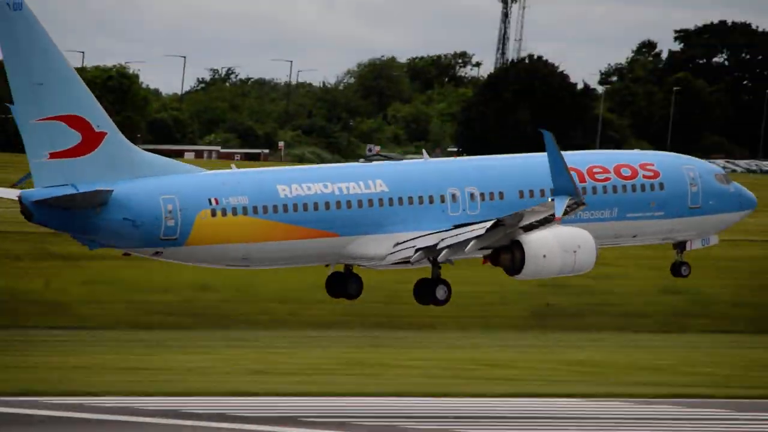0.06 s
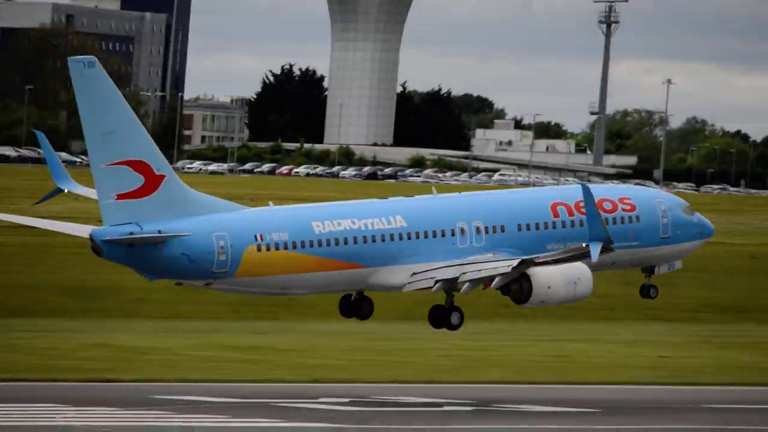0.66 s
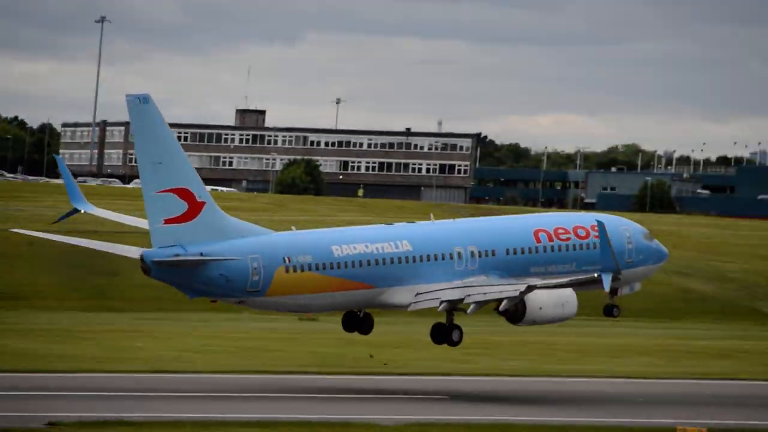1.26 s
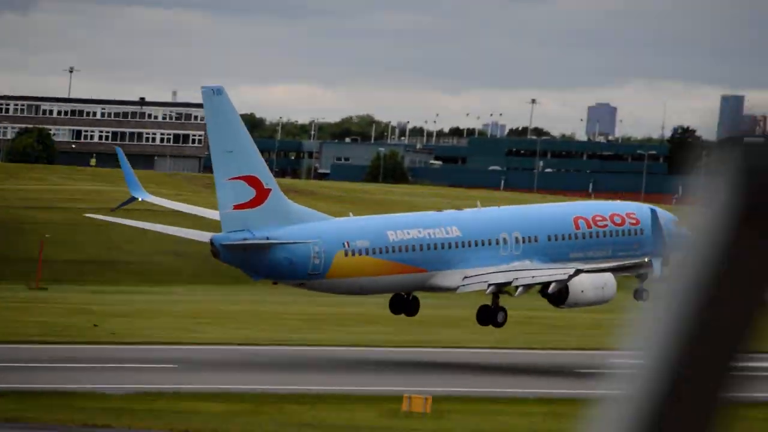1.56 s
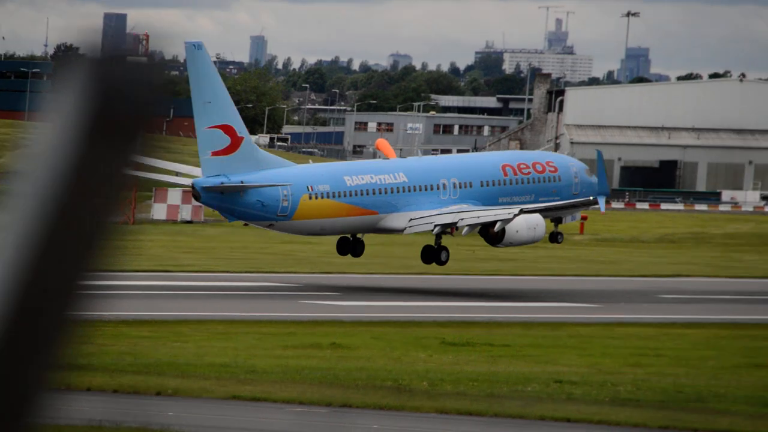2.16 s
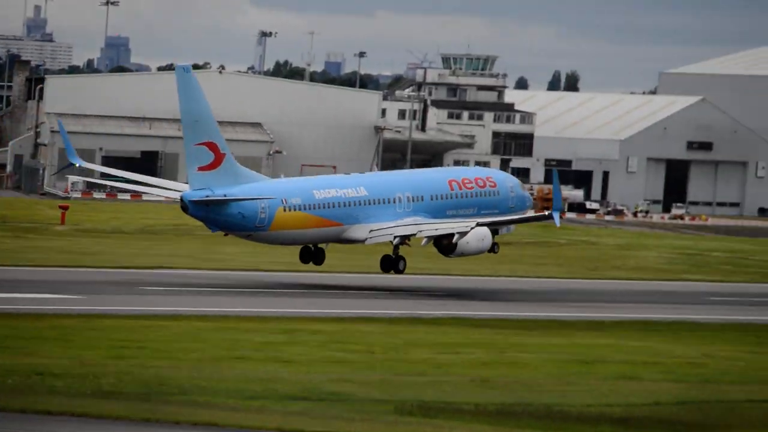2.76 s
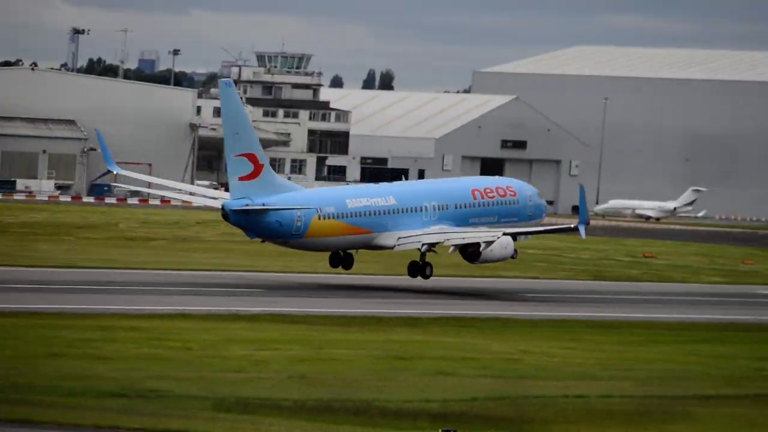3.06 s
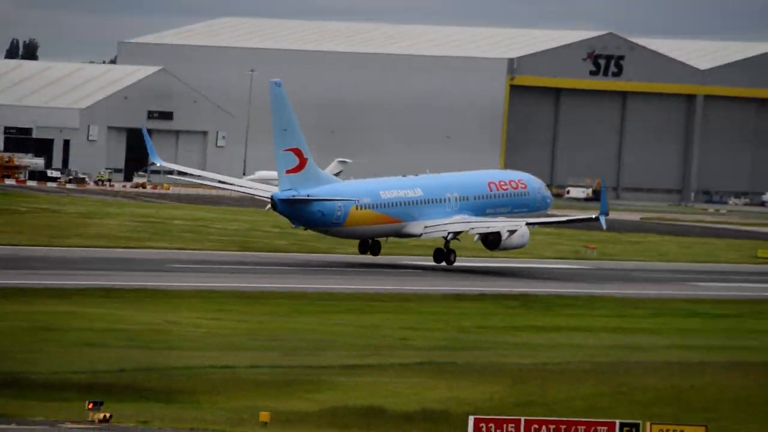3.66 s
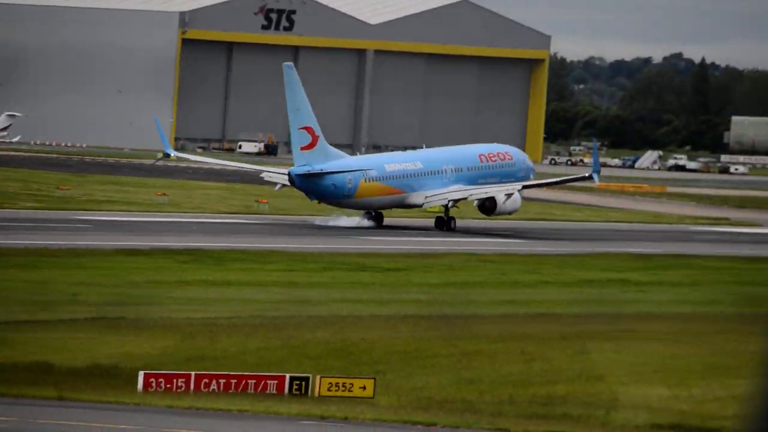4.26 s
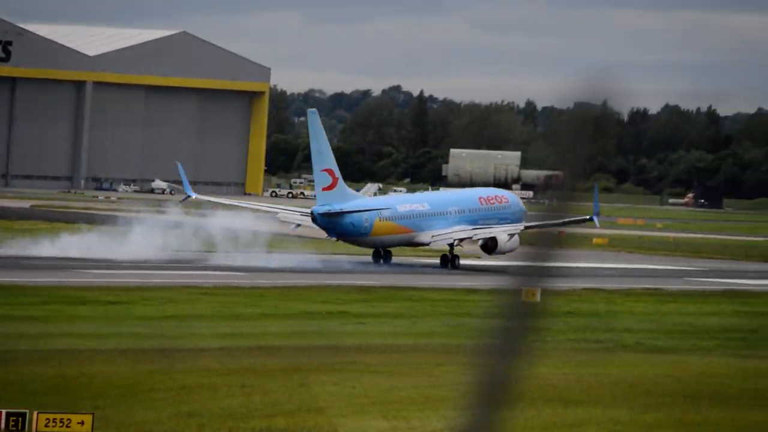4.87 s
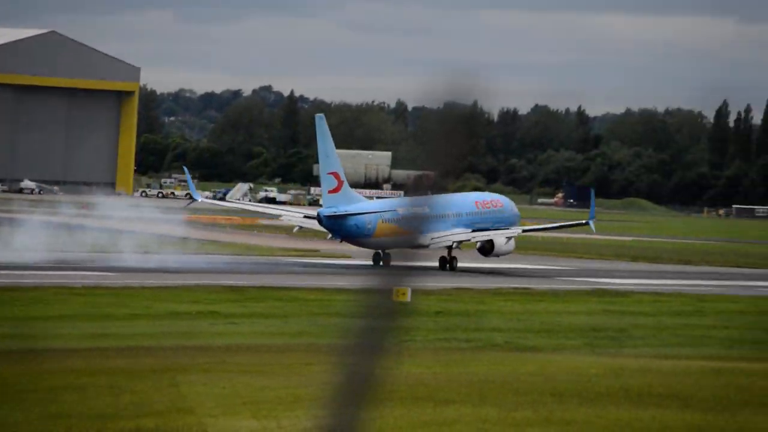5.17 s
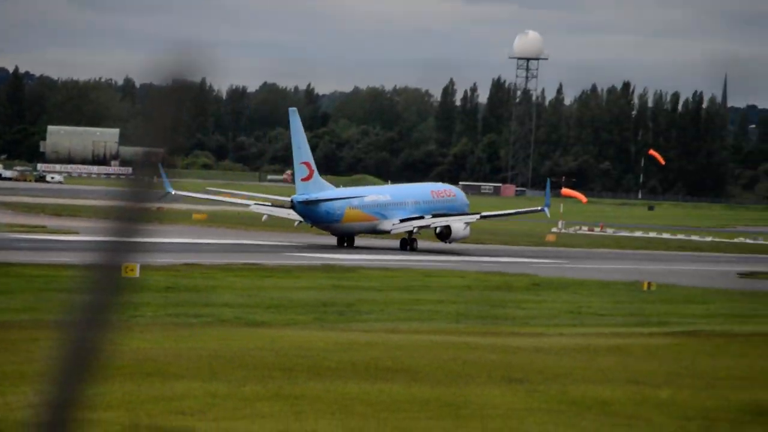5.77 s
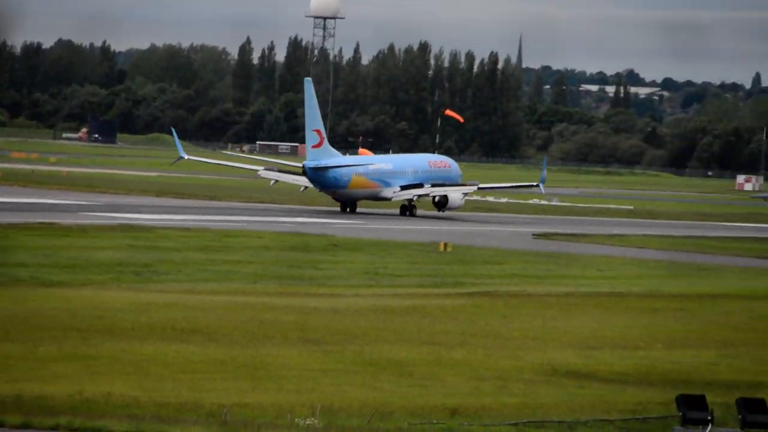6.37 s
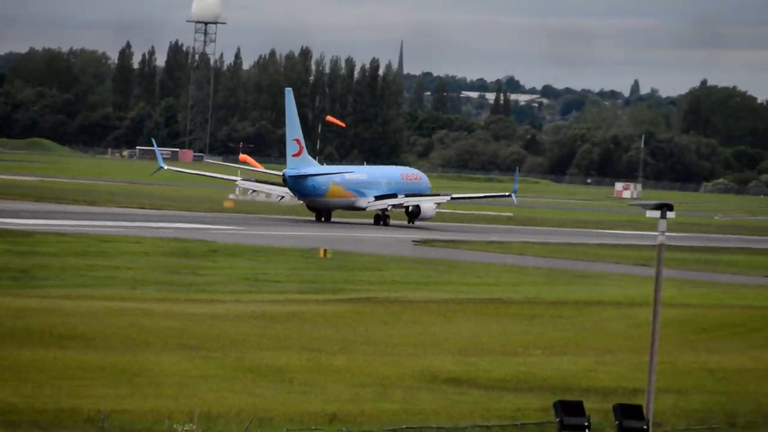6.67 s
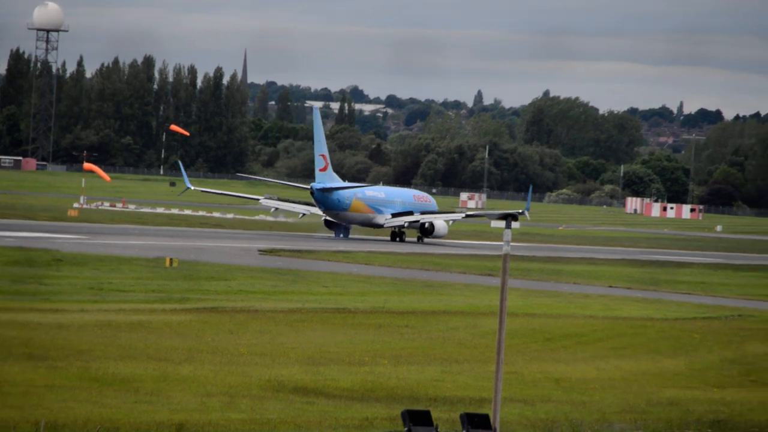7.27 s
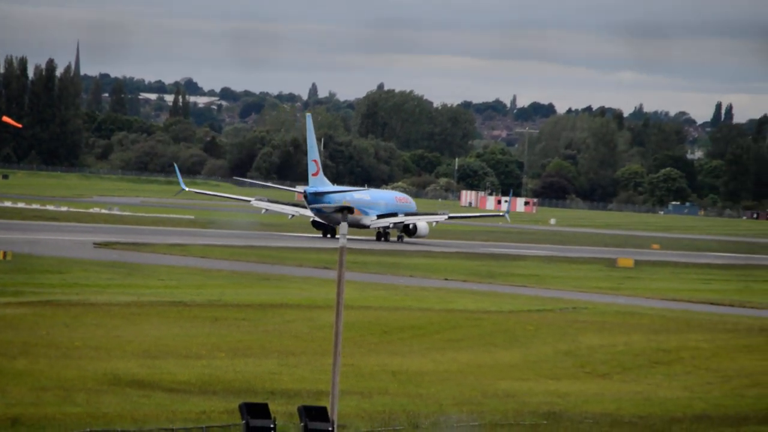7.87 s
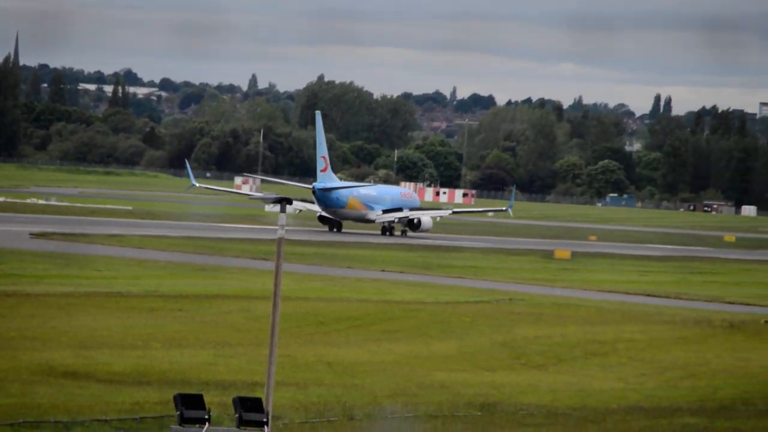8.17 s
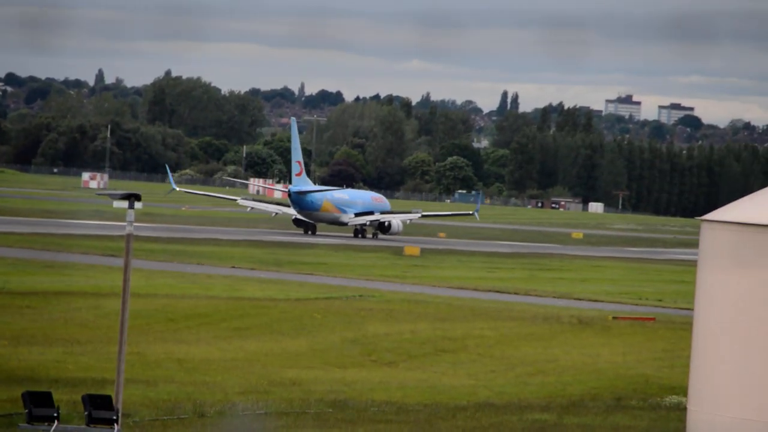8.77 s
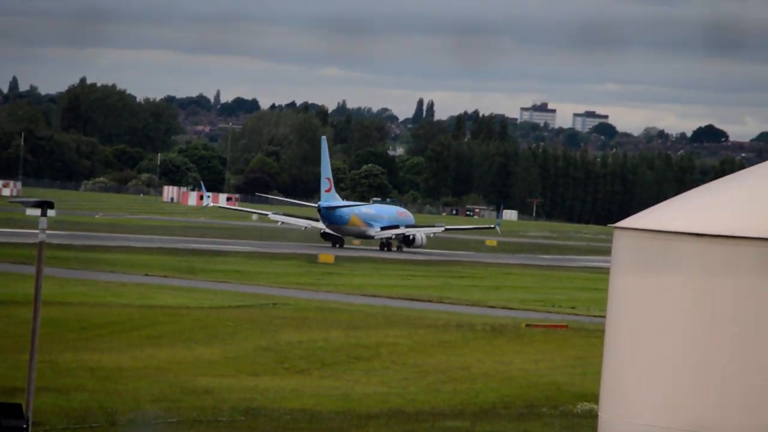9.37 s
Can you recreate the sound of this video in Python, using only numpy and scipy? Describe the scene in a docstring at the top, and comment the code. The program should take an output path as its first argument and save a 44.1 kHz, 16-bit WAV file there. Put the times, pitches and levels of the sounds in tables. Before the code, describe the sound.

Deep, ragged wind rumble and thumps hit the microphone over a receding jet, its hiss giving way to a faint, distant whine.

```python
"""A jet airliner recedes along the runway, heard from the windy airfield fence.
Air absorption dulls its hiss with distance, the roar fades, the turbine whistle sinks by Doppler shift,
and later the fans whine from far off; moving air makes them all swell and flicker.
Eddies on the microphone port give a deep, ragged rumble, sharp pops and thumps, and overload it.
Faint beneath: microphone hiss, two high ticks and a distant bird."""
import sys
import numpy as np
from scipy import signal
from scipy.fft import rfft, irfft, next_fast_len
from scipy.io import wavfile
from scipy.ndimage import uniform_filter1d, map_coordinates

SR = 44100
rng = np.random.default_rng(int(sys.argv[2]) if len(sys.argv) > 2 else 0)


def wav_record(signal):
    """Record a signal, one row per channel, as 16-bit PCM in the file named by sys.argv[1]."""
    frames = np.transpose(np.atleast_2d(signal))
    bounded = np.clip(frames, -1, 1)
    # unit amplitude maps onto the largest positive 16-bit level
    quanta = np.round(bounded * 32767).astype(np.int16)
    wavfile.write(sys.argv[1], SR, quanta)


N = 414981

# Strong eddies bursting on the port. Each row: time in seconds, peak in dB, edge steepness in Hz.
POPS = [(.165, -1, 800), (.435, -6, 600), (.475, -4, 520), (.565, -1, 660), (.577, -4, 700), (.61, -4, 650),
        (.894, -5, 740), (.955, -2.5, 840), (.974, -4, 750), (1.007, -2, 840), (1.016, -6.5, 840),
        (1.102, -4, 720), (1.197, -4, 700), (1.252, -7, 700), (1.314, -3.5, 920), (1.428, -6, 760),
        (1.539, -7, 800), (1.555, -2.5, 800), (1.578, -8, 750), (1.64, -5, 760), (1.706, -7.5, 750),
        (1.94, -6, 700), (2.073, -1, 720), (2.344, -3, 650), (2.406, -1.5, 700), (2.425, -3, 920),
        (2.523, -5.5, 680), (2.533, -8, 650), (2.674, -2, 600), (2.705, 1, 1280), (2.832, -3, 500),
        (2.885, -8, 680), (3.024, -8, 600), (3.167, -7, 720), (3.207, -2.5, 557), (3.648, -7, 650),
        (3.753, -1.5, 710), (3.829, -6, 780), (3.986, -1, 660), (4.016, -6, 720), (4.037, -5, 660),
        (4.131, -6, 600), (4.367, -1, 680), (4.372, -5, 680), (4.419, -3, 580), (4.453, -5, 700),
        (4.518, -3.5, 560), (4.536, -2.5, 620), (4.568, -2, 740), (4.599, -2, 660), (4.655, -5, 680),
        (5.006, -2.5, 800), (5.147, -2, 650), (5.175, -8, 720), (5.4, -3.5, 720), (5.657, -3, 980),
        (5.675, -3.5, 650), (5.816, -4, 760), (5.912, -7, 700), (6.104, -2, 880), (6.201, -7, 620),
        (6.254, -3.5, 700), (6.303, -6, 660), (6.353, -5.5, 740), (6.8, -6.5, 740), (7.074, -2, 680),
        (7.131, -8, 800), (7.263, -7, 600), (7.367, -3, 720), (7.525, -6.5, 650), (7.626, -2, 563),
        (7.67, -1, 680), (7.738, -1.5, 680), (7.755, -3.5, 620), (7.82, -5, 520), (7.976, -2, 620),
        (8.118, -4.5, 620), (8.282, -9.5, 1320), (8.508, -1, 720), (8.589, -5.5, 650), (8.632, -5, 780),
        (8.647, -2, 780), (8.812, -1, 650), (8.954, -3, 560), (8.984, -11, 1800), (9.023, -12, 1280),
        (9.125, -15, 1700), (9.13, -4, 750), (9.158, -4.5, 800), (9.251, 1.5, 1330), (9.27, -9, 720),
        (9.382, -4, 480)]
RUMBLE_DB, FLUTTER_DB = -17.5, -24  # steady breeze


def amp(db):
    """Decibels to gain."""
    return 10 ** (np.asarray(db) / 20)


def unit(x):
    """Scale to rms 1."""
    return x / np.sqrt(np.mean(x ** 2) + 1e-20)


def curves(rows):
    """Per-sample curve for each column after the time."""
    times_s, *columns = np.transpose(rows)
    return [np.interp(np.arange(N) / SR, times_s, column) for column in columns]


def plateaus(rows, rise_s, fall_s):
    """Each (start, length, height, ..) row rises, holds and falls; one summed curve per height column."""
    t = np.arange(N) / SR
    out = np.zeros((len(rows[0]) - 2, N))
    for start_s, length_s, *heights in rows:
        ramp = np.minimum((t - start_s) / rise_s, (start_s + length_s - t) / fall_s)
        out += np.outer(heights, np.clip(ramp + .5, 0, 1))
    return out


def wobble(knots_per_s):
    """Smooth random curve, rms 1."""
    position = np.arange(N) * knots_per_s / SR + 2
    return unit(map_coordinates(rng.standard_normal(N // 16), [position], order=3, mode="mirror"))


def noise(spectrum, size=N):
    """Noise of rms 1 coloured by (Hz, dB) points."""
    fft_size = next_fast_len(size)
    hz, db = np.transpose(spectrum)
    gain = amp(np.interp(np.log(np.fft.rfftfreq(fft_size, 1 / SR) + 1), np.log(hz), db))
    return unit(irfft(rfft(rng.standard_normal(fft_size)) * gain, fft_size)[:size])


def steadied(x, window_s):
    """Hold the rms near 1 over the window, keeping faster surges."""
    width = max(int(window_s * SR), 1)
    power = uniform_filter1d(uniform_filter1d(x ** 2, width), width)
    return x / np.sqrt(np.abs(power) + 1e-9)


def fuzzy_tone(hz, width_hz):
    """Tone scattered into a band, as by turbulent air; rms 1."""
    phase = 2 * np.pi * np.cumsum(hz) / SR
    return unit(wobble(width_hz) * np.cos(phase) + wobble(width_hz) * np.sin(phase))


def settling(tau_s):
    """Falls from 1 towards 0 as the jet turns its tail to the listener."""
    return np.exp(-np.arange(N) / SR / tau_s)


def distance_m(t):
    """Range of the jet, already past its nearest point."""
    nearest_m, speed_m_per_s, passed_s = 105, 66, 1
    return np.hypot(nearest_m, speed_m_per_s * (t + passed_s))


def air(x, steepness, tilt):
    """Air absorption: distance tilts the treble down and closes a steep low-pass."""
    hz, t, spectra = signal.stft(x, SR, nperseg=512)
    start_corner_hz = 7400
    corner_hz = start_corner_hz * (distance_m(0) / distance_m(t)) ** .35
    farness = start_corner_hz / corner_hz - 1
    treble_octaves = np.log2(np.maximum(hz, 1000) / 1000)[:, None]
    gain = amp(-tilt * farness * treble_octaves) / np.sqrt(1 + (hz[:, None] / corner_hz) ** steepness)
    return signal.istft(spectra * gain, SR, nperseg=512)[1][:N]


def patchy(x, depth_db):
    """Moving air focuses some pitches and cancels others, in passing patches."""
    spectra = signal.stft(x, SR, nperseg=512)[2]
    field = rng.standard_normal(spectra.shape)
    for _ in range(2):
        field = uniform_filter1d(uniform_filter1d(field, size=9, axis=0), size=16, axis=1)
    return signal.istft(spectra * amp(depth_db * unit(field)), SR, nperseg=512)[1][:N]


def jet(swell_db):
    """Engine hiss and roar: loud side-on, faint from behind, flickering in the moving air."""
    # Spectra. Each row: frequency in Hz, relative density in dB.
    hiss_spectrum = [(300, -20), (900, -7.5), (1500, 5), (2200, 5.5), (3000, 4), (4100, 2), (5100, 1),
                     (6500, -1.5), (9000, -6.5), (11000, -21), (16000, -19)]
    roar_spectrum = [(30, -14), (120, -18), (300, -8.5), (650, -2.5), (1100, -2), (1600, -11.5),
                     (2500, -19), (5000, -65), (9000, -120)]
    hiss = steadied(air(noise(hiss_spectrum), steepness=9.2, tilt=10), window_s=.26)
    hiss = unit(patchy(hiss, depth_db=1.6))
    flicker_db = .8 * wobble(30)
    hiss_db = -51 + 21.5 * settling(tau_s=1.31) + swell_db + flicker_db
    roar_db = -43.5 + 18.5 * settling(tau_s=1.02) + .43 * swell_db + flicker_db
    return amp(hiss_db) * hiss + amp(roar_db) * noise(roar_spectrum)


def turbine(swell_db):
    """Thin whistles share one Doppler glide and fade into the air."""
    # Turbine partials. Each row: ratio to the pitch, relative level in dB.
    partials = [(.4975, -4), (.586, -6), (.6425, -4), (.805, -5), (1, 1.5), (1.05, -7), (1.116, -3),
                (1.218, -6), (1.628, -11)]
    receding_hz, doppler_hz, fall_db_per_s = 5270, 540, 10
    hz = receding_hz + doppler_hz * settling(tau_s=1.8)
    level_db = -49 - fall_db_per_s * np.arange(N) / SR + .5 * swell_db
    whistles = sum(amp(db) * fuzzy_tone(ratio * hz, width_hz=32) for ratio, db in partials)
    return air(amp(level_db) * whistles, steepness=6.2, tilt=7)


def wind_levels():
    """Rumble level, flutter level and brightness of the breeze through gusts and lulls."""
    # Each row: start in seconds, length in seconds, flutter gain in dB, brightness in octaves.
    gusts = [(.14, .12, 5.5, 0.1), (.41, .21, 9.5, 0.016), (.87, .17, 5, 0.0021), (1.08, .67, 2.5, 0.28),
             (1.95, .17, 6.5, 0.22), (2.18, .04, 4.5, -0.0069), (2.32, .14, 7.5, -0.086),
             (2.67, .05, 9, 0.069), (3.6, .23, 4, -0.017), (3.98, .07, 4, 0.24), (4.39, .23, 5, 0.085),
             (5, .17, 6.5, -0.072), (5.64, .19, 9, 0.00073), (6.22, .14, 6.5, 0.021),
             (7.62, .22, 8, 0.0059), (7.97, .05, 8, 0.017), (8.22, .1, 6.5, 0.036), (8.46, .09, 10.5, .3),
             (8.59, .11, 5.5, 0.19), (8.8, .05, 4.5, 0.13), (8.89, .11, 11, -0.27), (9.08, .08, 10, -0.082)]
    # Each row: start in seconds, length in seconds, flutter drop in dB, rumble drop in dB.
    lulls = [(.19, 0.17, -0.5, 6), (.74, .11, 1, 2.5), (1.77, 0.097, 4.5, 3.5), (2.12, .06, 10.5, 8),
             (2.22, 0.055, 8, 7), (2.5, .16, 7.5, 7), (2.88, .12, 4.5, 0.5), (3.05, .07, 8.5, 6),
             (3.27, .08, 6.5, -1), (3.41, .13, 6.5, -1), (3.86, .11, 0, 3), (4.05, .05, 5, 5),
             (4.67, .05, 7.5, 7), (4.86, .07, 5, -2.5), (5.21, .12, 5, 2.5), (5.42, .15, 6, 5),
             (5.94, .14, 6, 1.5), (6.49, 0.066, 8, 4), (7.15, .05, 10, 3.5), (7.53, .07, 5.5, 3.5),
             (7.88, .08, 6.5, 4), (8.33, .1, 3, 1.5), (8.52, 0.367, 0.5, 8), (8.72, .07, 7, 6)]
    gust_db, bright_octaves = plateaus(gusts, rise_s=.022, fall_s=.03)
    flutter_drop_db, rumble_drop_db = plateaus(lulls, rise_s=.03, fall_s=.022)
    # The flutter stalls just before each strong pop, less so in a gust.
    stall_s, stall_depth_db = .03, 8
    stalls = [(at_s - stall_s, stall_s, stall_depth_db) for at_s, _, _ in POPS]
    stall_db, = plateaus(stalls, rise_s=stall_s / 2, fall_s=stall_s / 2)
    wander_db = 3.4 * np.tanh(wobble(55))
    rumble_db = RUMBLE_DB - rumble_drop_db + 2.3 * np.tanh(wobble(22))
    flutter_db = FLUTTER_DB + gust_db - flutter_drop_db - stall_db * amp(-gust_db)
    return rumble_db + wander_db, flutter_db + wander_db, bright_octaves


def wind(rumble_db, flutter_db, bright_octaves):
    """Eddies sweep the port: faster flow is louder and brighter; gusts merge them into a full buffet."""
    # Spectra. Each row: frequency in Hz, relative density in dB.
    rumble_spectrum = [(10, -17.5), (25, -20.5), (50, -5), (85, -0.5), (125, -0.5), (200, -6), (300, -10.5),
                       (500, -21.5), (1000, -62.5), (2000, -120)]
    flutter_spectrum = [(40, -32), (120, -14.5), (220, 5), (450, 1.5), (700, -7), (1000, -17.5),
                        (1500, -30.5), (2200, -54.5), (4000, -100), (6000, -120)]  # at speed 1
    surge = 1.7 * np.tanh(wobble(60) * .45 + wobble(280) * .55)
    fronts = np.tanh(np.maximum(wobble(380) - .7, 0))  # steep edges of single eddies
    gust = np.clip((flutter_db - FLUTTER_DB) / 8, 0, 1)
    speed = 2 ** bright_octaves * np.exp(.26 * surge + .46 * fronts - .05)
    turbulence = noise(flutter_spectrum, size=2 * N)
    eddies = map_coordinates(turbulence, [np.cumsum(speed)], order=3, mode="mirror")
    eddies *= amp((5.9 * surge + 3.2 * fronts) * (1 - .4 * gust))
    flutter = (1 - gust) * steadied(eddies, window_s=.035) + gust * steadied(eddies, window_s=.01)
    rumble = steadied(noise(rumble_spectrum) * amp(4 * surge), window_s=.05)
    return amp(rumble_db) * rumble + amp(flutter_db) * flutter


def mic_hiss():
    """Faint self-noise that swells softly now and then."""
    # Each row: frequency in Hz, relative density in dB.
    spectrum = [(100, -2), (5000, -0.5), (9000, -1), (12000, -4), (16000, -9)]
    # Each row: start in seconds, length in seconds, gain in dB.
    swells = [(2.92, .55, 3), (3.95, .25, 4), (5.98, 0.29, 6), (7.25, 0.41, 3), (8.78, .22, 7.5)]
    swell_db, = plateaus(swells, rise_s=.12, fall_s=.12)
    return amp(-70.5 + swell_db) * noise(spectrum)


def swing(edge_hz, size):
    """One pressure swing, peak 1; a steeper edge gives more treble."""
    ratio = np.fft.rfftfreq(size, 1 / SR) / edge_hz
    crack = amp(-27) * min(edge_hz / 1400, 1) ** 7  # only the steepest swings crack
    gain = ratio ** .22 * (np.exp(-.75 * ratio ** 1.5) + crack * np.exp(-ratio / 3))
    shape = np.roll(irfft(gain * np.exp(2j * np.pi * rng.random()), size), size // 2)
    return shape / np.abs(shape).max()


def random_pops(flutter_db, db, edge_hz, count):
    """Weak bursts as rows like POPS: more frequent in gusts, softer in lulls."""
    chance = np.cumsum(amp(flutter_db))
    at = np.searchsorted(chance, rng.uniform(.01, .99, count) * chance[-1])
    sizes, edges = np.tanh(rng.standard_normal((count, 2))).T
    lull_db = np.minimum(flutter_db[at] - FLUTTER_DB, 0)
    peaks_db = db + 3 * sizes + lull_db
    return list(zip(at / SR, peaks_db, edge_hz * (1 + .25 * edges)))


def pops(flutter_db):
    """Eddies burst on the port: a steep swing, then a weaker, duller rebound."""
    small = random_pops(flutter_db, db=-8.5, edge_hz=600, count=10)
    tiny = random_pops(flutter_db, db=-33, edge_hz=2100, count=90)
    bursts = POPS + small + tiny
    rebounds_s = rng.uniform(.002, .005, len(bursts))
    out, size = np.zeros(N + SR), 1024
    for (at_s, db, edge_hz), rebound_s in zip(bursts, rebounds_s):
        for delay_s, gain_db, edge_ratio in [(0, 0, 1), (rebound_s, -6, .5)]:
            start = round((at_s + delay_s) * SR) - size // 2
            out[start:start + size] += amp(db + gain_db) * swing(edge_hz * edge_ratio, size)
    return out[:N]


def thumps():
    """Large, slow eddies each give the port a round push of about two swings."""
    # Each row: time in seconds, relative peak in dB, frequency in Hz.
    eddies = [(.477, -6, 255), (.611, -5, 204), (.915, -5, 259), (1.293, -8, 236), (1.978, -7, 179),
              (2.344, -8, 260), (2.406, -4, 190), (2.443, -6, 140), (2.751, -6, 158), (3.142, -5, 147),
              (3.629, -7, 222), (3.773, -7, 215), (4.131, -6, 211), (4.298, -7, 178), (4.611, -7, 171),
              (4.761, -7, 160), (4.972, -7, 154), (5.177, -7, 217), (5.407, -7, 154), (5.52, -4, 180),
              (5.584, -6, 199), (5.652, -5, 188), (5.982, -7, 175), (6.47, -6, 185), (6.636, -7, 208),
              (6.76, -6, 202), (6.812, -6, 209), (7.13, -7, 185), (7.82, -7, 226), (8.227, -7, 194),
              (8.896, -6, 184), (8.984, -2, 290), (9.023, -6, 280), (9.09, -6, 247)]
    half_width_cycles, gain_db = .85, -1.6
    out = np.zeros(N)
    t = np.arange(-SR // 20, SR // 20) / SR
    for at_s, db, hz in eddies:
        envelope = amp(db + gain_db) * np.exp(-(hz * t / half_width_cycles) ** 2)
        out[round((at_s + t[0]) * SR):][:len(t)] += envelope * np.cos(2 * np.pi * (hz * t + rng.random()))
    return out


def tick(at_s, hz, db, half_width_s):
    """A short, thin, high tick near the microphone."""
    t = np.arange(N) / SR
    envelope = amp(db) * np.exp(-((t - at_s) / half_width_s) ** 2)
    return envelope * fuzzy_tone(np.full(N, hz), width_hz=2100)


def fans(swell_db):
    """The blade tone and its breathy octave waver, each in a skirt of scattered sound."""
    # Each row: time in seconds, blade rate in Hz, level before swells in dB.
    whine = [(5.84, 1620, -68), (5.89, 1612, -45), (6.2, 1653, -53), (6.72, 1643, -51.5), (7.0, 1636, -67),
             (7.32, 1647, -47.5), (7.5, 1620, -44.5), (7.82, 1650, -46.5), (8.12, 1623, -40),
             (8.26, 1627, -40), (8.38, 1632, -48.5), (8.68, 1592, -47), (8.82, 1608, -43.5),
             (8.95, 1665, -45.5), (9.2, 1584, -43.5), (9.41, 1560, -42.5)]
    hz, db = curves(whine)
    db += .81 * swell_db
    hz *= 1 + .007 * wobble(32)
    blade = steadied(fuzzy_tone(hz, width_hz=65), window_s=.07)
    skirt = steadied(fuzzy_tone(hz, width_hz=190), window_s=.07)
    octave = fuzzy_tone(2 * hz, width_hz=200) + fuzzy_tone(2 * hz, width_hz=420)
    flicker_db = 1.9 * np.tanh(wobble(30))
    octave_db = .66 * db - 28.5 + .5 * flicker_db  # swells less than the blade tone
    return amp(db + flicker_db) * (blade + skirt) + amp(octave_db) * octave


def bird():
    """A small bird far off: two faint, quick glides."""
    # Each row: start in seconds, length in seconds, start pitch in Hz, end pitch in Hz, relative dB.
    chirps = [(7.19, .035, 5550, 6060, -70), (7.218, 0.032, 5300, 4200, -62)]
    out = np.zeros(N)
    for start_s, length_s, start_hz, end_hz, db in chirps:
        hz = np.linspace(start_hz, end_hz, int(length_s * SR))
        envelope = amp(db + 6) * np.hanning(len(hz)) ** .5
        out[round(start_s * SR):][:len(hz)] += envelope * np.sin(2 * np.pi * np.cumsum(hz) / SR)
    return out


def scene():
    """The aircraft behind the wind, with ticks, bird and microphone hiss; mono."""
    # Moving air carries the engine sound over. Each row: start in seconds, length in seconds, gain in dB.
    swells = [(.11, 0.063, 3.5), (.275, 0.14, 8), (.505, 0.053, 4), (.62, 0.089, 3), (.855, 0.067, 6.5),
              (.98, 0.095, 4), (1.25, 0.02, 7), (1.84, 0.14, 9.5), (1.98, 0.276, 7.5), (2.25, 0.14, 8.5),
              (2.42, 0.099, -4), (2.6, 0.27, 2.5), (2.92, 0.77, 6), (4.85, 0.19, 4), (5.33, 0.33, 3.5),
              (5.88, .43, 2.5), (6.1, 0.17, 5), (7.2, 0.48, 4.5), (7.99, 0.26, 4), (8.77, 0.19, 7.5),
              (9.27, .2, 1.5)]
    swell_db, = plateaus(swells, rise_s=.045, fall_s=.03)
    rumble_db, flutter_db, bright_octaves = wind_levels()
    aircraft = jet(swell_db) + turbine(swell_db) + fans(swell_db)
    buffeting = wind(rumble_db, flutter_db, bright_octaves) + pops(flutter_db) + thumps()
    ticks = tick(at_s=1.853, hz=9200, db=-51, half_width_s=.006)
    ticks += tick(at_s=3.68, hz=9000, db=-63, half_width_s=.025)
    return (aircraft + buffeting + ticks + bird() + mic_hiss())[None]


def record(dry):
    """Microphone overload: strong gusts clip and crackle faintly; the result is band-limited."""
    ceiling, hardness, crackle_above, top_hz = .98, 14, .31, 15800
    clipped = dry / (1 + np.abs(dry / ceiling) ** hardness) ** (1 / hardness)
    crackle = amp(-45) * np.maximum(np.abs(clipped) - crackle_above, 0) * rng.standard_normal(N)
    passband = np.fft.rfftfreq(N, 1 / SR) < top_hz
    return irfft(rfft(clipped + crackle) * passband, N)


dry = scene()
out = record(dry)
wav_record(out)
```